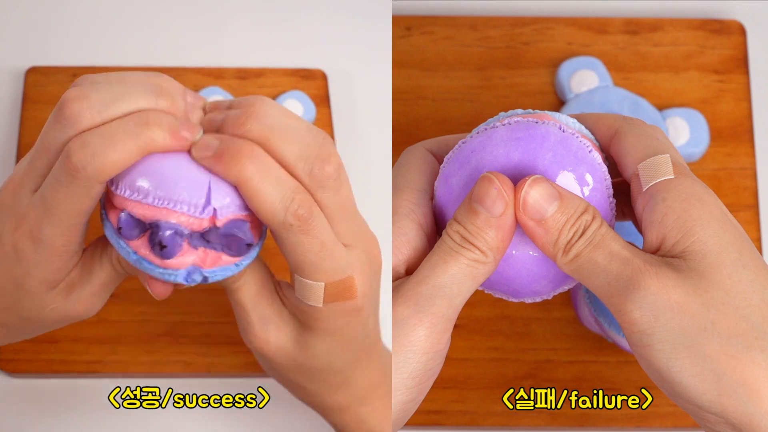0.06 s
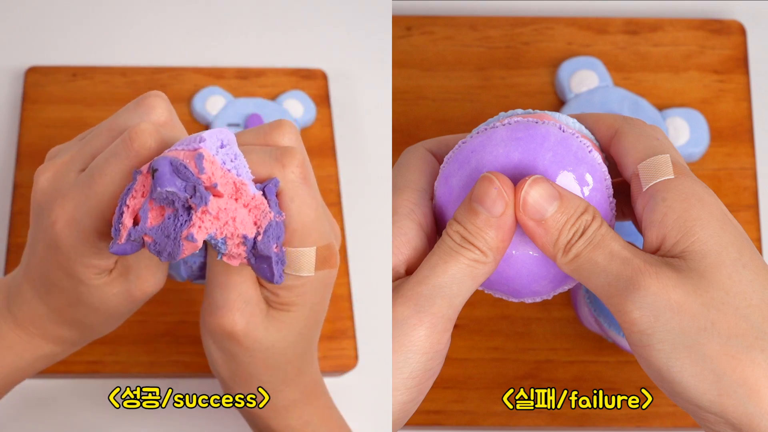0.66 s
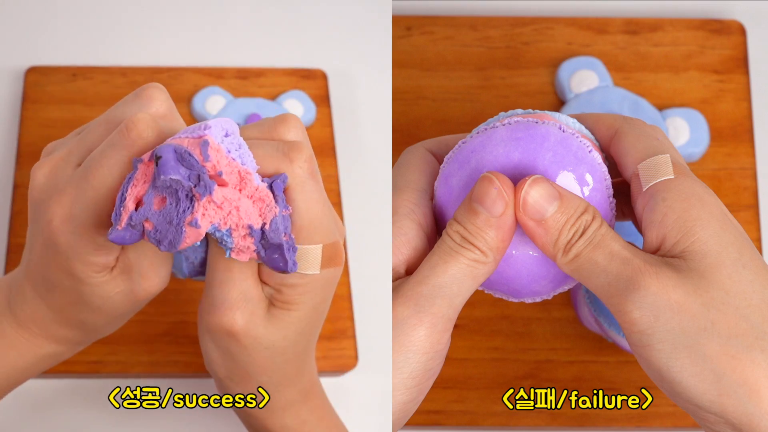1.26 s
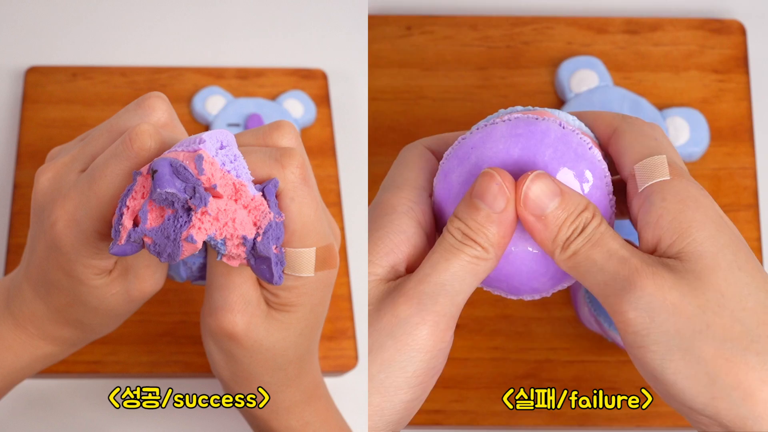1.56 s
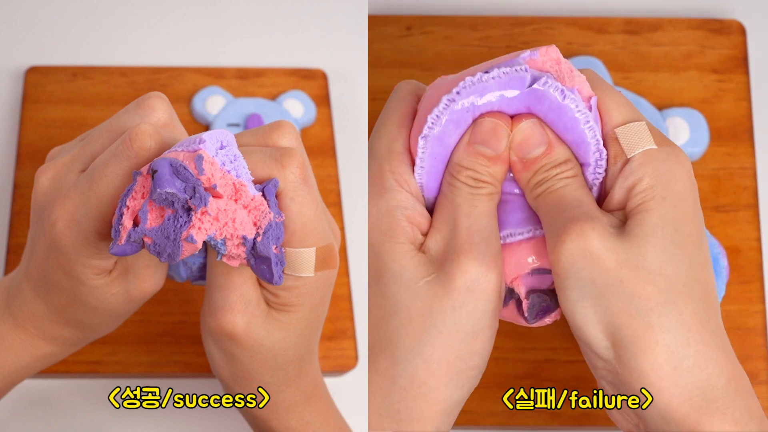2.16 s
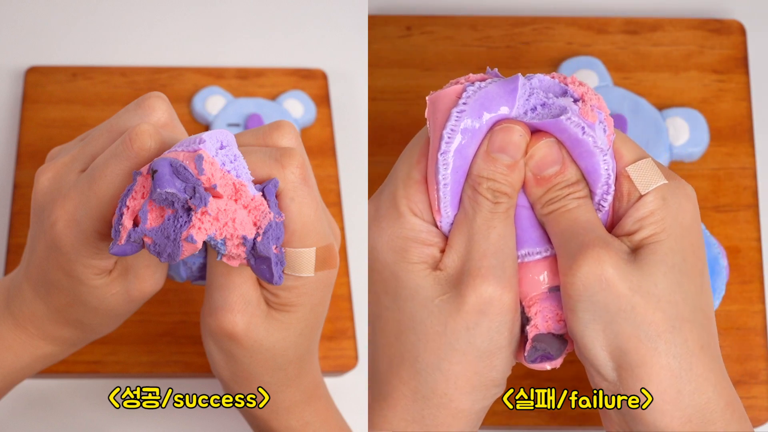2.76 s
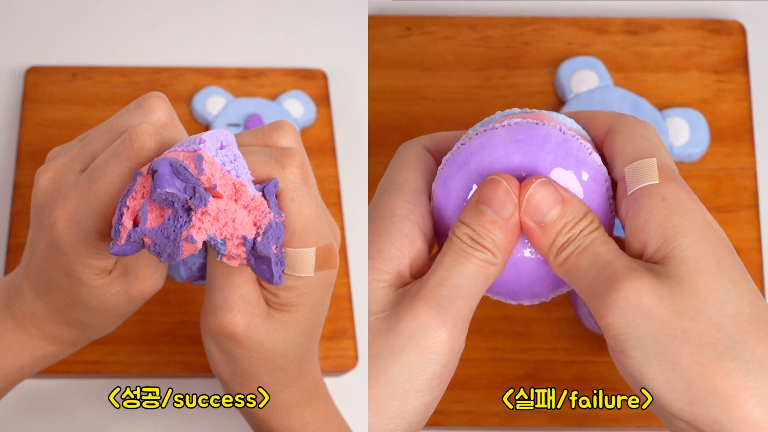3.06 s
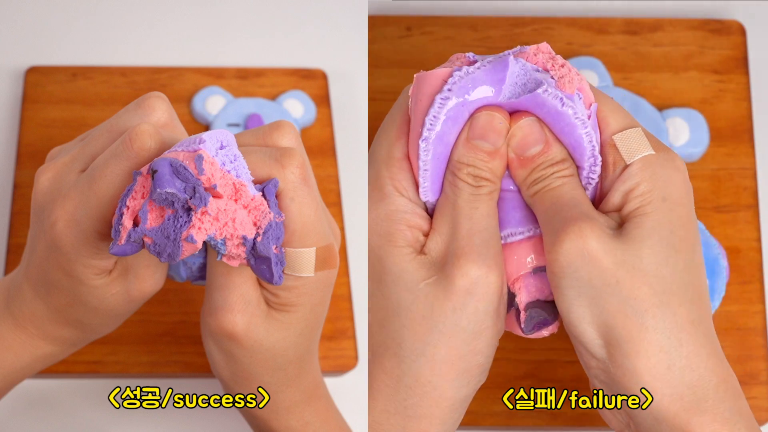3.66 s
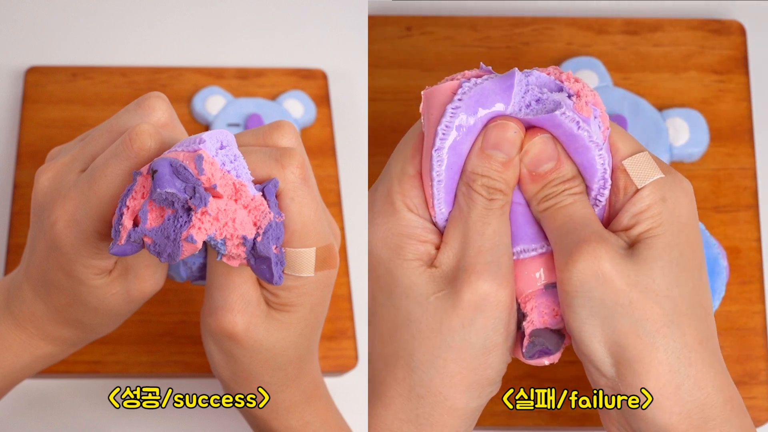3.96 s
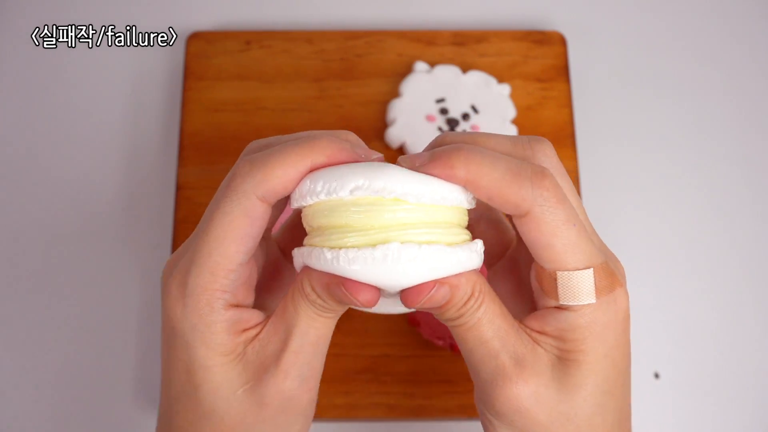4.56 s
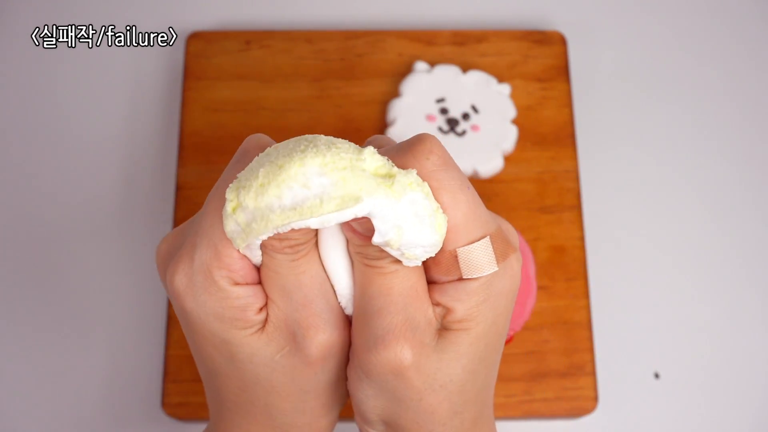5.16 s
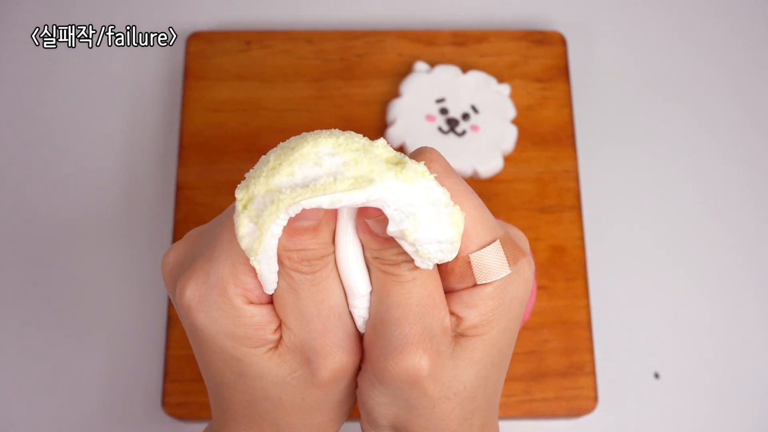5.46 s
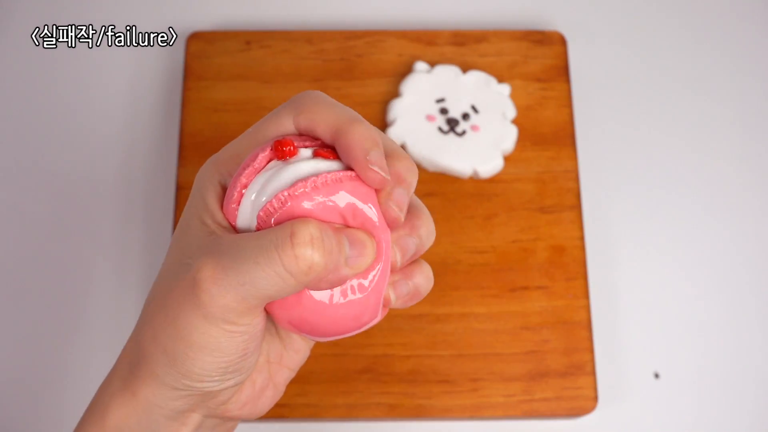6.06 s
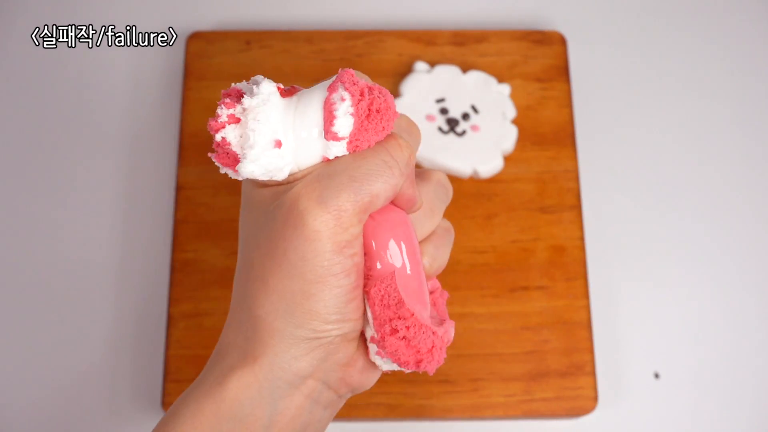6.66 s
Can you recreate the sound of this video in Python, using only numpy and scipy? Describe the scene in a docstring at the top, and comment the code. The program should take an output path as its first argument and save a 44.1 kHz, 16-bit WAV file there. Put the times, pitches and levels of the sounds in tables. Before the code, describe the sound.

Hands crush hard-coated clay macarons close to the microphone in a small room. A loud, dense crunch of dry cracks and fine crumbs is heard twice in a row. A second, looser crunch trailing into single ticks also plays twice. After a pause, fingers rub softly on a shell and a more scattered crackle follows. A last crunch builds from small ticks. Faint hiss and low hand rumble lie underneath.

```python
"""Crushing clay macarons

Hands crush four hard-coated clay macarons, close up, over a wooden board in a small room.
The coat breaks in dry cracks, each ringing a fragment for a few milliseconds, with fine crumbs between.
The loudest cracks overload and clip flat. The first two crunches are each heard twice."""
import sys
import numpy as np
from scipy import signal
from scipy.fft import rfft, irfft
from scipy.io import wavfile
from scipy.ndimage import uniform_filter1d

SR = 44100
rng = np.random.default_rng(int(sys.argv[2]) if len(sys.argv) > 2 else 0)


def wrap_up_sound(samples):
    """Save the sound to the file named by the first command line argument, as 16-bit audio."""
    columns = np.atleast_2d(samples).T
    # keep every value between -1 and 1, then stretch to whole-number steps
    tamed = np.clip(columns, -1, 1)
    steps = np.round(tamed * 32767).astype(np.int16)
    wavfile.write(sys.argv[1], SR, steps)


N = 300762

# the loud cracks and the lone ones: start_s, level_db (over 4 ms), ring_hz, treble_db, tear_ms
MAIN_CRACKS = [(0.0613, -21.5, 4440, -2, 4.1), (.0837, -30.5, 5100, -3.5, .8),
               (.1077, -33, 4233, -6.5, 2.1), (0.115, -4.5, 3950, -11.5, 0.85), (0.1226, -14, 2280, 1, 4.3),
               (0.1293, -2, 6800, -10, 2), (0.136, -4, 3980, -2.5, 1.2), (0.1402, -11, 5950, -5, 3.5),
               (0.1467, -11.5, 6760, 0, 0.86), (0.1621, -8, 6930, -2.5, 13), (.171, -10.5, 6680, -2, 10),
               (0.181, -3.5, 4570, -0.5, 3.7), (.1854, -4, 2730, -9.5, 2.8), (0.1898, 4.5, 4800, 1.5, 0.64),
               (.1925, -4, 924, -7, 1.4), (0.1948, 0.5, 3700, -4.5, 0.74), (0.204, -5, 3440, -2.5, 1.9),
               (0.2092, -7, 3750, -4.5, 1), (0.2133, -9.5, 4510, -5.5, 2.2), (.224, -11.5, 7900, -3.5, 7.6),
               (0.2353, -14.5, 8220, -3, 2.6), (0.2445, -13, 8460, -2, 3), (.252, -8.5, 4480, -1.5, .9),
               (0.269, -13.5, 7870, -3.5, .7), (0.2744, -10.5, 7460, 3, 0.5), (0.2852, -6, 1950, -0.5, 4.2),
               (0.2976, -6.5, 4700, -3, 0.5), (.3034, -9, 2000, -3, 1), (0.3096, -6.5, 1904, -5, 1.2),
               (0.3227, -9.5, 3780, -9, 0.7), (0.344, -12.5, 3830, -5, 1.7), (0.357, -21, 1940, -10, 0.66),
               (0.3797, -10, 7350, -6, 1.5), (.3853, -26, 8480, 6, .3), (0.397, -17.5, 5940, -9, 3.5),
               (.4121, -14, 7240, -2.5, 2.9), (0.427, -18, 7200, -5, 1.3), (0.4723, -20.5, 4020, -4, 1.8),
               (0.4864, -19, 4030, -2.5, 2.9), (0.511, -25, 5870, -4, 2.3), (.522, -21, 5430, -3, 3.4),
               (1.89, -34.5, 6390, -4, .5), (1.9248, -28.5, 4920, -17.5, 1.3), (1.926, -9, 6030, -9.5, 3.6),
               (1.94, -5.5, 1750, -2, 0.88), (1.946, -12, 1780, -13.5, 2.6), (1.9528, -12, 1780, -11.5, 2),
               (1.9618, -6, 1780, -3, 4.5), (1.9661, -2.5, 2710, -20.5, 0.79),
               (1.99, -12.5, 5730, -4, 0.84), (2.0057, -8.5, 4830, -8, 2.6), (2.0322, -8.5, 4020, -7, 1),
               (2.0431, -10, 6150, -6, 1.5), (2.0658, -9.5, 6760, -9.5, 1.7), (2.0899, -12, 4820, -14, 2.3),
               (2.0935, -9.5, 4700, -0.5, 1.2), (2.103, -14, 5730, -13, 4.4),
               (2.1161, -18.5, 5510, 1, 0.99), (2.1298, -16.5, 8100, -9.5, 5),
               (2.1618, -12.5, 6850, 1, 0.19), (2.1686, -15, 2500, 0, 3.3),
               (2.1824, -15.5, 6720, -7.5, 0.75), (2.1941, -13.5, 2970, -3, 5),
               (2.2113, -12.5, 7000, -2, 0.75), (2.2486, -10, 2500, -12, 4.3), (2.2563, -4, 8000, -1, 0.35),
               (2.26, -8, 3130, -11, 1.7), (2.2976, -17, 3270, -10.5, 0.72), (2.405, -24.5, 7480, -2, 0.17),
               (2.5159, -35, 7600, 2, 0.14), (2.5261, -39, 6900, -2, 0.36), (2.636, -37, 7060, -9, 1.2),
               (2.684, -41, 5510, -7, 0.41), (2.6869, -19, 3320, -12, 0.61),
               (2.811, -18.5, 7020, -13, 0.16), (2.8322, -32, 6290, 1, 0.16), (2.88, -20, 5400, 2, 0.28),
               (4.6706, -30, 1577, -14, 1.85), (4.694, -25, 2960, -8, 4.5), (4.7181, -16, 1650, -6.5, 6.6),
               (4.722, -5, 1600, -16, 1), (4.723, -9.5, 3080, -11, 1.8), (4.7462, -25.5, 3080, 5, 1.2),
               (4.803, -30.5, 2820, -3, .9), (4.8117, -22, 5940, -6, 0.18), (4.875, -16.5, 4420, -1.5, 8.2),
               (4.8791, -14.5, 5840, -1.5, 5.5), (4.8849, -14, 5670, -17.5, 0.37),
               (4.902, -16, 5900, -16, 2.7), (4.9191, -16.5, 1790, -6, 1.2), (4.9335, -20, 5700, -8, 0.87),
               (4.937, -2, 2760, -7, 0.7), (4.9534, -17, 2450, -10, 2), (5.0483, -9.5, 2620, -9.5, 2.3),
               (5.074, -5.5, 2676, -8, 1.9), (5.0865, -18.5, 2512, -14, 1), (5.1407, -13, 6150, -7, 1.7),
               (5.1518, -22, 4060, -12, 0.74), (5.2357, -26.5, 5900, -10, 1),
               (5.3415, -28.5, 5700, 4, 0.076), (5.413, -40.5, 2630, -13, 1.6),
               (5.4384, -36, 2980, -5, 4.3), (5.7896, -37, 3140, -28.5, 1.7), (6.1994, -28, 6530, -2, 0.46),
               (6.2607, -20, 6660, -4.5, 1.2), (6.2925, -30, 5630, -1, 0.44),
               (6.3068, -26.5, 6540, -3, 0.19), (6.3574, -19.5, 7640, 6, 0.17),
               (6.3833, -9.5, 2820, -10, 1.3), (6.3938, -15.5, 5070, -1, 2.7),
               (6.4011, -14, 4970, -12, 0.26), (6.4117, -10.5, 2890, -4, .5),
               (6.4291, -8, 2760, -3.5, 0.39), (6.4452, -14.5, 5430, -5, 0.41), (6.4982, -14, 4340, -8, 1),
               (6.518, -14, 6760, -7, 1.4), (6.5326, -16, 1190, -18, 0.44), (6.5564, -8, 1710, -4, 1.6)]
# the tone all cracks share: pitch_hz, level_db
COAT_TONE = [(40, -24), (120, -28.5), (220, -11), (420, -12.5), (750, -2), (1300, 2), (2500, 4.5),
             (5000, 5), (8000, 7.5), (10500, 4.5), (13000, -1.5), (16000, -12)]
# each macaron's basic sound: start_s, ring_db, body_db, room_db, resonance_hz, resonance_db
MACARONS = [(0, 5, -5, 0.1, 1950, 3), (1.6, 6.5, -2, 0.5, 2800, 2.5), (4.3, 7, -5, 1.5, 2560, 5.5),
            (5.9, 4.5, -0.5, -0.5, 2750, 2)]
# one squeeze per macaron, at full force: start_s, end_s, small_cracks_db, crumbs_db
SQUEEZES = [(.18, .28, -16, -29), (1.95, 2.2, -30.5, -38), (4.774, 5.1, -37.5, -44),
            (6.397, 6.46, -30.5, -45)]
# the whole shell gives way: start_s, peak_db
COLLAPSES = [(0.113, -30), (0.128, -25.5), (0.189, -19), (0.207, -24.5), (1.951, -30.5), (2.089, -35.5),
             (4.719, -22.5)]
# the strained coat ticks: start_s, end_s, ticks_per_s, lowest_peak_db
STRAINS = [(.08, .11, 120, -31), (.55, .77, 20, -41), (2.42, 2.87, 22, -41), (4.66, 4.87, 40, -36),
           (5.2, 5.55, 12, -44), (5.78, 5.84, 70, -44), (6.2, 6.37, 50, -37)]
# fingers slide on the coat: start_s, length_s, loudest_db
FINGER_SLIDES = [(4.473, 0.18, -36.5), (5.761, 0.071, -44.5)]
# the tone of rubbing skin: pitch_hz, level_db
SKIN_TONE = [(290, -71.5), (500, -29), (603, -30.5), (739, -41.5), (806, -24), (1340, -14), (2000, -20),
             (2380, -13), (4240, -8.5), (5920, -4.5), (15800, -14)]
# the tone of the room's echo: pitch_hz, level_db
ECHO_TONE = [(100, -10.5), (300, -12), (450, -8), (600, -7), (900, -5.5), (2000, -13), (4000, -11),
             (8000, -12), (15000, -11)]
# how long the echo takes to fall 60 dB: pitch_hz, decay_s
ECHO_DECAY = [(150, .42), (500, .35), (1500, .31), (5000, .29), (9000, .25), (15000, .2)]
# low notes the room rings at: pitch_hz, width_hz, level_db
ROOM_NOTES = [(174, 14, 4.5), (215, 9.1, 9), (338, 8.5, 12), (503, 4, 3.1), (557, 6.1, 1)]
# how alike left and right are in the echo and slides: pitch_hz, likeness (0 to 1)
ROOM_LIKENESS = [(100, .99), (2000, .98), (4000, .9), (8000, .82), (15000, .7)]
# the hands press: loudest_s, level_db
HAND_PRESSES = [(.06, -43), (0.762, -57), (2.0, -63), (2.72, -59.5), (4.75, -65), (5.5, -63)]
# the tone of the hands' rumble: pitch_hz, level_db
RUMBLE_TONE = [(15, -20), (35, -9), (48, -9), (62, 0), (80, -8), (120, -13), (180, -22), (500, -34),
               (2000, -60), (8000, -90)]
# the tone of the room's noise and hiss: pitch_hz, level_db
NOISE_TONE = [(12, -36), (20, -4.5), (74, -10), (123, -7.5), (145, -13), (182, -13.5), (203, -16.5),
              (355, -16), (431, -18), (469, -21.5), (524, -18.5), (917, -27.5), (15800, -32.5)]
# how alike left and right are in the noise and rumble: pitch_hz, likeness (0 to 1)
NOISE_LIKENESS = [(50, .95), (500, .9), (2000, .7), (10000, .4)]
# stretches heard twice: start_s, end_s, again_s
REPEATS = [(0, .777, .80079), (1.578, 2.912, 2.91268)]

LARGE_FRAGMENT_HZ = 2800  # smaller fragments ring higher and die away sooner


def cracks(size=1024, tear_gain=.38, snap_ms=.15, splinter_s=.012, beam_gain=.24, beam_hz=8000):
    """Each crack snaps and tears the coat, ringing a fragment. Returns direct and room-bound sound."""
    direct, to_room = np.zeros((2, 2, N))
    t, hz = np.arange(size) / SR, np.fft.rfftfreq(size, 1 / SR)
    fade = np.minimum(2 - 2 * t / t[-1], 1)
    for start, db, ring_hz, treble_db, tear_ms in MAIN_CRACKS + small_cracks():
        tone_db, ring_db, room_db = fragment_tone(start, db, ring_hz, treble_db, hz)
        rip, grains, side_noise = rng.standard_normal((3, size))
        tearing = np.exp(-1000 * t / max(tear_ms, .1))
        splinter_db = -26 - 7 * np.exp(-tear_ms / snap_ms)  # a clean snap sheds fewer splinters
        splinters = amp(splinter_db) * grains * abs(grains) * np.exp(-t / splinter_s)
        force = tear_gain * (rip * tearing + splinters)
        force[0] += 1  # the snap itself
        # a brittle break feeds all pitches nearly alike, so the fragment sets the tone
        blow = rfft(force)
        blow /= np.sqrt(uniform_filter1d(abs(blow) ** 2, size=25))
        fragment = ringing_filter(tone_db + ring_db)
        middle = irfft(blow * fragment)
        gain = fade * amp(db) * np.sqrt(.004 * SR) / np.linalg.norm(middle)
        # treble leaves in uneven beams, so left and right differ
        beams = rfft(side_noise * tearing) / np.linalg.norm(side_noise * tearing)
        side = beam_gain * irfft(beams * fragment * np.minimum(hz / beam_hz, 2))
        add(direct, start, gain * np.array([middle + side, middle - side]))
        # only large fragments spread their ring all round
        ring_share = .8 / (1 + (ring_hz / (1.4 * LARGE_FRAGMENT_HZ)) ** 4)
        spread = irfft(blow * ringing_filter(tone_db + ring_share * ring_db))
        # a short snap is beamed upwards and stirs the room less than a long tear
        room_gain = amp(room_db - 5 * np.exp(-tear_ms))
        add(to_room, start, room_gain * gain * spread[None])
    return direct, to_room


def fragment_tone(start, db, ring_hz, treble_db, hz, typical_db=-15, flatten_s=.16):
    """Shell and fragment shape a crack. Returns its tone, its ring and its room level, all in dB."""
    which = sum(start >= macaron[0] for macaron in MACARONS[1:])
    _, ring_db, body_db, room_db, shell_hz, shell_db = MACARONS[which]
    # a stronger break rings more clearly, sounds fuller and stirs the room more
    extra_db = db - typical_db
    ring_db += .13 * extra_db - 1.33 * np.log2(ring_hz / LARGE_FRAGMENT_HZ)  # small pieces ring less
    body_db += .37 * extra_db - .13 * (treble_db + 6.5)  # bright cracks are thinner
    room_db += .02 * extra_db
    # once squeezed, the hollow shell flattens and loses body
    squeezed_s = np.clip(start - SQUEEZES[which][0], 0, flatten_s)
    body_db += 7.5 - 14.5 * squeezed_s
    hollow_db = shell_db / (1 + ((hz - shell_hz) / 200) ** 2)
    tilt_db = look_up([(1200, body_db), (2300, 0), (5500, 0), (8800, treble_db)], hz)
    tone_db = look_up(COAT_TONE, hz) + hollow_db + tilt_db
    width_hz = .14 * ring_hz * np.sqrt(ring_hz / LARGE_FRAGMENT_HZ)
    notes = [(ring_hz, ring_db), (2.1 * ring_hz, ring_db - 7)]  # the ring and its overtone
    power = sum(amp(height) ** 2 / (1 + ((hz - pitch) / width_hz) ** 2) ** 2 for pitch, height in notes)
    return tone_db, 10 * np.log10(1 + power), room_db


def small_cracks(count=64, per_s=85, spread_db=2.5, low_hz=2800, high_hz=8600, longest_tear_ms=2.8):
    """Lists lesser cracks that run at random through each squeeze, as strong as its force."""
    rows = []
    for start, end, db, _ in SQUEEZES:
        place, pitch, brightness, length = rng.random((count, 4)).T
        when = start + (np.arange(count) + place - 2) / per_s
        force_db = squeeze_db(when, start, end)
        level_db = db + force_db + spread_db * rng.standard_normal(count)
        ring_hz = low_hz * (high_hz / low_hz) ** pitch
        treble_db = -6 + 9.5 * brightness
        candidates = np.transpose([when, level_db, ring_hz, treble_db, length * longest_tear_ms])
        rows += list(candidates[force_db > -20])
    return rows


def squeeze_db(t, start, end, grip_db_per_s=426, release_db_per_s=86):
    """The force of a squeeze builds quickly, holds, and dies away."""
    return -grip_db_per_s * np.maximum(start - t, 0) - release_db_per_s * np.maximum(t - end, 0)


def crumbs(per_s=900, spread_db=5, ring_s=.0013, pitches=16, size=256):
    """Tiny flakes snap at random, each with a short ring, loudest during a squeeze."""
    out, t = np.zeros((2, N)), np.arange(size) / SR
    tries = int(N / SR * 400)
    for hz in np.geomspace(1500, 11500, pitches):
        place, chance, strength = rng.random((3, tries))
        snaps = chance < per_s / pitches / tries * N / SR
        clicks = np.zeros(N)
        clicks[(place * N).astype(int)] = snaps * amp(-spread_db * np.log(strength + .016))
        flake = np.sin(2 * np.pi * hz * t) * np.exp(-t / (ring_s * np.sqrt(4000 / hz)))
        pan = rng.uniform(-.25, .25)
        out += np.outer([1 + pan, 1 - pan], signal.oaconvolve(clicks, flake)[:N])
    loudness = sum(amp(db + squeeze_db(np.arange(N) / SR, start, end)) for start, end, _, db in SQUEEZES)
    return loudness * unit_level(out)


def thumps(pitch_hz=225, length_s=.009):
    """A collapsing shell shoves the air and springs back, with hardly any ring."""
    out, t = np.zeros((2, N)), np.arange(0, length_s, 1 / SR)
    push = -np.sin(2 * np.pi * pitch_hz * t) * np.hanning(len(t))
    for start, db in COLLAPSES:
        add(out, start, amp(db) * np.array([push, push]) / abs(push).max())
    return out


def ticks(ring_s=.00013, size=128):
    """Hairline cracks open at random in the strained coat, before and after it breaks."""
    out, t = np.zeros((2, N)), np.arange(size) / SR
    for start, end, per_s, db in STRAINS:
        for when, strength, pitch, pan in rng.random((round((end - start) * per_s), 4)):
            hz = 3000 + 6000 * pitch
            tick = (np.sin(2 * np.pi * hz * t) + rng.standard_normal(size)) * np.exp(-t / ring_s)
            gain = amp(db + 10 * strength) / abs(tick).max()
            stereo = np.outer([.75 + pan / 2, 1.25 - pan / 2], tick)
            add(out, start + when * (end - start), gain * stereo)
    return out


def finger_slides(grit=.12, sharpness=1.25):
    """Skin rubs over the coat with a fine, slightly gritty hiss that swells and fades."""
    t = np.arange(N) / SR
    hiss = rng.standard_normal((2, N))
    roughness = np.exp(grit * unit_level(uniform_filter1d(rng.standard_normal(N), 60)))
    swell = sum(amp(db) * abs(np.sin(np.pi * np.clip((t - start) / length, 0, 1))) ** sharpness
                for start, length, db in FINGER_SLIDES)
    return swell * unit_level(shape_noise(hiss * roughness, SKIN_TONE, ROOM_LIKENESS))


def room(sound, first_s=.0013, build_s=.014, early_db=-1, early_s=.022, size=24000):
    """Echoes build up into a short, smooth tail; a few low room notes ring under it."""
    t = np.arange(size) / SR
    echoes = rng.standard_normal((2, size)) * (rng.random((2, size)) < .2)
    echoes *= np.clip((t - first_s) / build_s, 0, 1) * (1 + amp(early_db) * np.exp(-t / early_s))
    hz, frame_s, bands = signal.stft(echoes, SR, nperseg=256)
    decay = amp(-60 * frame_s / look_up(ECHO_DECAY, hz)[:, None])
    tail = signal.istft(bands * decay, SR, nperseg=256)[1][:, :size]
    tail = shape_noise(tail / np.linalg.norm(tail, axis=1, keepdims=True), ECHO_TONE, ROOM_LIKENESS)
    for pitch_hz, width_hz, db in ROOM_NOTES:
        note = np.exp(-np.pi * width_hz * t) * np.sin(2 * np.pi * pitch_hz * t)
        tail += amp(db) * 2 * np.pi * width_hz / SR * note
    return signal.oaconvolve(sound, tail, axes=1)[:, :N]


def hand_rumble(resting_db=-67.5, settle_s=.36):
    """Moving hands rumble, loudest as they press, and then settle."""
    t = np.arange(N) / SR
    presses = sum(amp(db) * np.exp(-abs(t - when) / settle_s) for when, db in HAND_PRESSES)
    rumble = shape_noise(rng.standard_normal((2, N)), RUMBLE_TONE, NOISE_LIKENESS)
    return (amp(resting_db) + presses) * unit_level(rumble)


def room_noise(final_db=-56.5):
    """Faint room noise and hiss, stepping down in level twice."""
    t = np.arange(N) / SR
    second_start_s, _, second_again_s = REPEATS[1]
    extra_db = np.select([t < second_start_s, t < second_again_s], [7, 1], 0)
    noise = shape_noise(rng.standard_normal((2, N)), NOISE_TONE, NOISE_LIKENESS)
    return amp(final_db + extra_db) * unit_level(noise)


def amp(db):
    """Turns decibels into a gain."""
    return 10 ** (np.asarray(db) / 20)


def unit_level(sound):
    """Scales a sound to an average (rms) level of 1."""
    return sound / np.sqrt(np.mean(sound ** 2) + 1e-20)


def look_up(table, hz):
    """Reads between a table's rows, with octaves evenly spaced."""
    pitches, values = np.transpose(table)
    return np.interp(np.log(hz + 1), np.log(pitches + 1), values)


def add(mix, start_s, sound):
    """Mixes a sound in at its start time."""
    part = mix[:, max(round(start_s * SR), 0):][:, :sound.shape[1]]
    part += sound[:, :part.shape[1]]


def ringing_filter(db):
    """A filter with the given gains whose ringing all comes after the blow (minimum phase)."""
    log_gain = np.log(amp(np.concatenate([db, db[-2:0:-1]])))
    return np.exp(np.conj(signal.hilbert(log_gain)))[:len(db)]


def shape_noise(pair, tone, likeness):
    """Gives two unrelated noises a tone and makes left and right partly alike."""
    spectra, hz = rfft(pair), np.fft.rfftfreq(pair.shape[1], 1 / SR)
    alike = np.clip(look_up(likeness, hz), 0, 1)
    middle, side = spectra[0] * np.sqrt((1 + alike) / 2), spectra[1] * np.sqrt((1 - alike) / 2)
    return irfft(np.array([middle + side, middle - side]) * amp(look_up(tone, hz)), pair.shape[1])


def scene():
    """The crushing in its room, with two stretches repeated."""
    direct, to_room = cracks()
    handling = thumps() + crumbs() + ticks() + finger_slides()
    out = direct + handling + room(to_room + handling) + room_noise() + hand_rumble()
    for start, end, again in REPEATS:
        stretch = out[:, round(start * SR):round(end * SR)].copy()
        out[:, round(again * SR):][:, :stretch.shape[1]] = stretch
    return out


def record(dry, balance_db=.36, cutoff_hz=16000):
    """The sound leans slightly left, the loudest cracks clip flat, and the highest treble is cut."""
    clipped = np.clip(dry * amp([[balance_db], [-balance_db]]), -.95, .95)
    low_pass = signal.firwin(255, cutoff_hz, window=("kaiser", 8), fs=SR)
    return signal.oaconvolve(clipped, low_pass[None], "same", axes=1)


dry = scene()
out = record(dry)
wrap_up_sound(out)
```